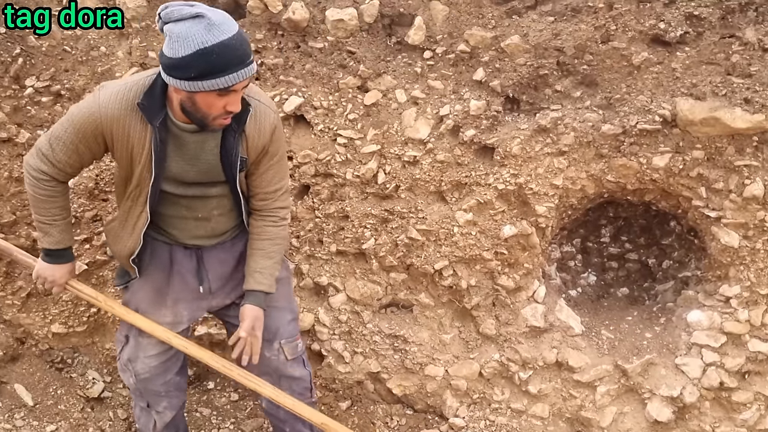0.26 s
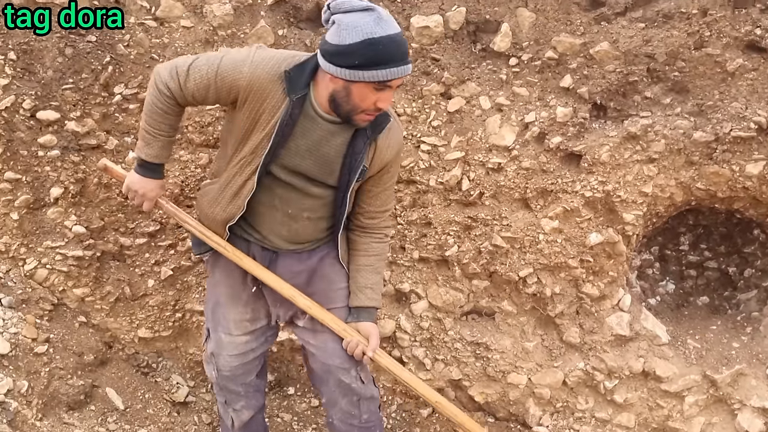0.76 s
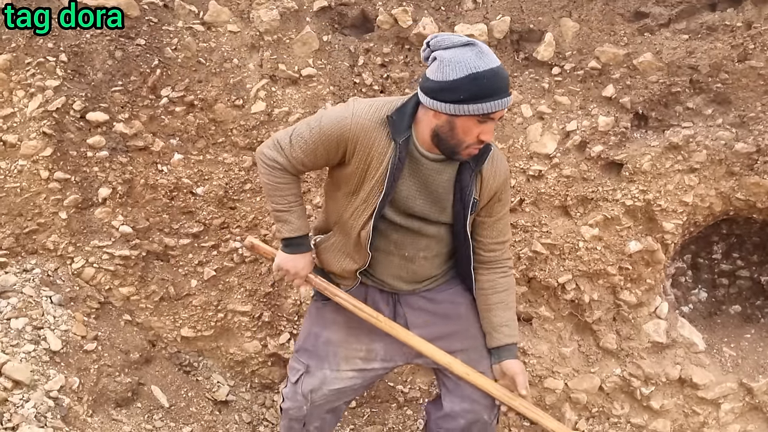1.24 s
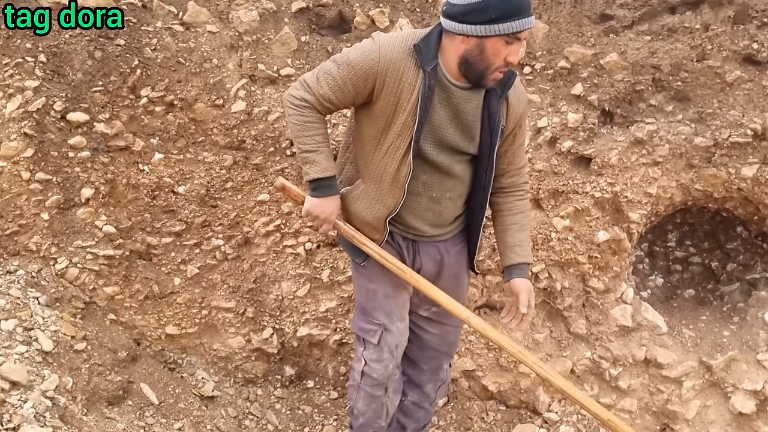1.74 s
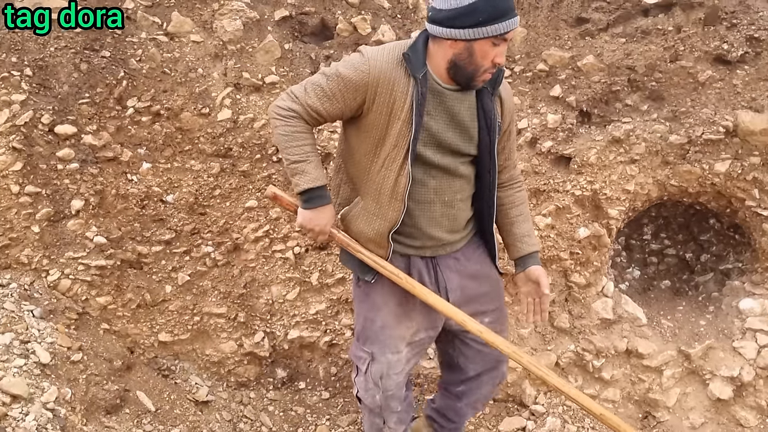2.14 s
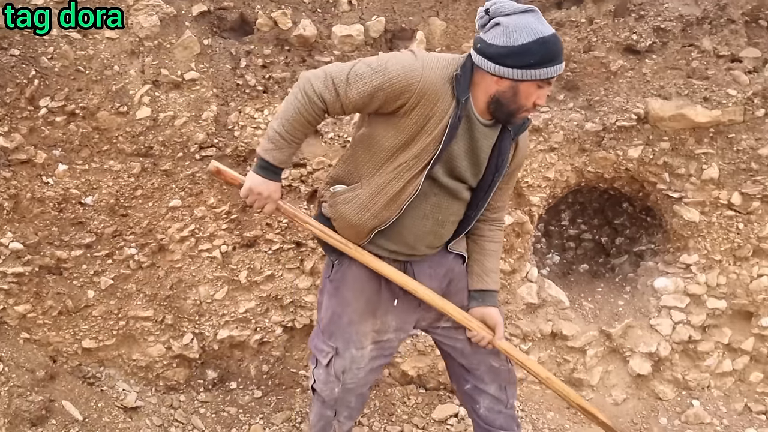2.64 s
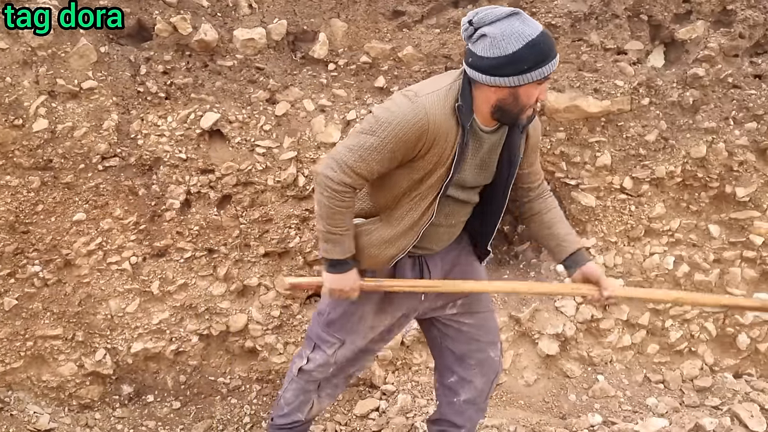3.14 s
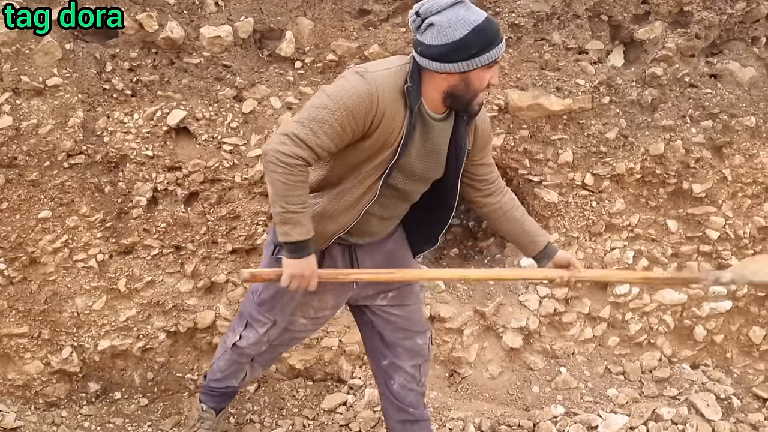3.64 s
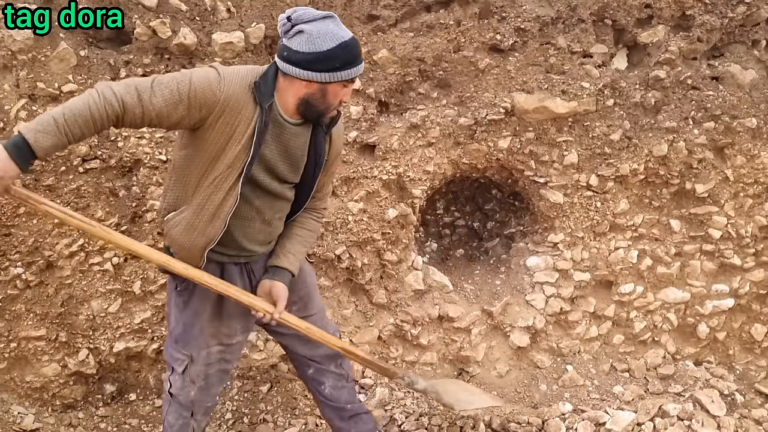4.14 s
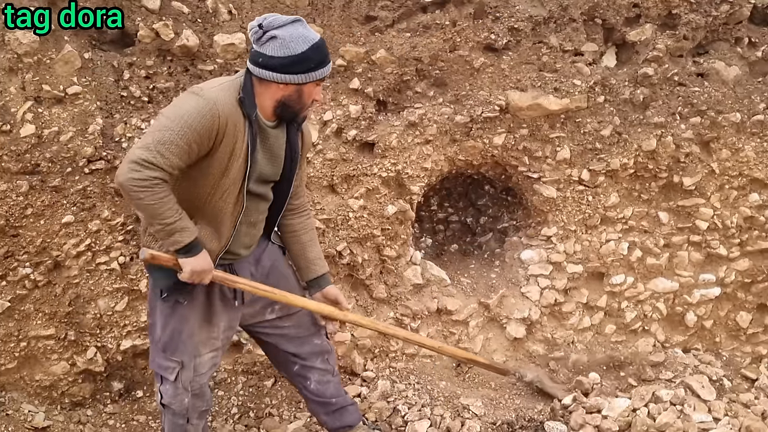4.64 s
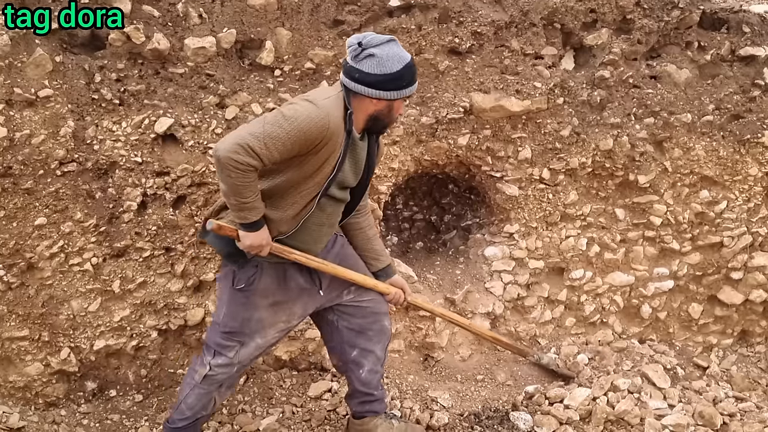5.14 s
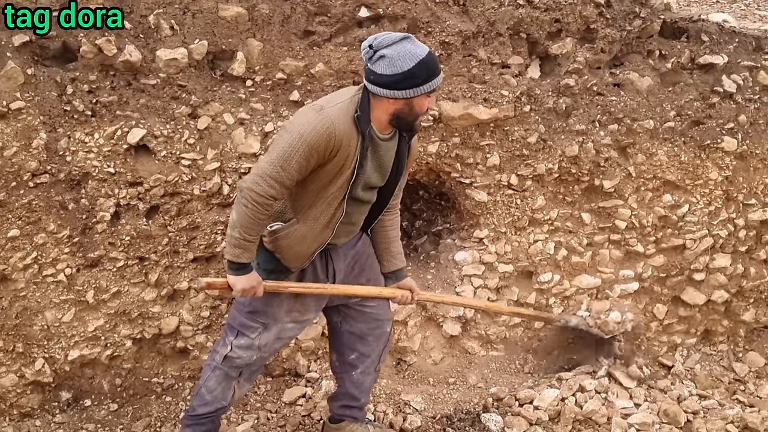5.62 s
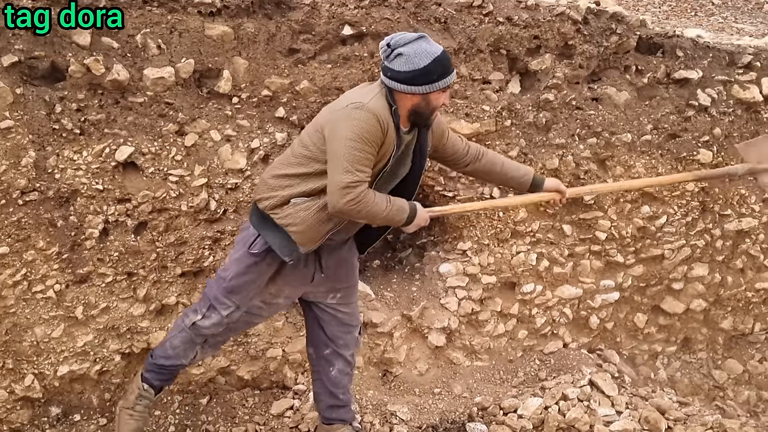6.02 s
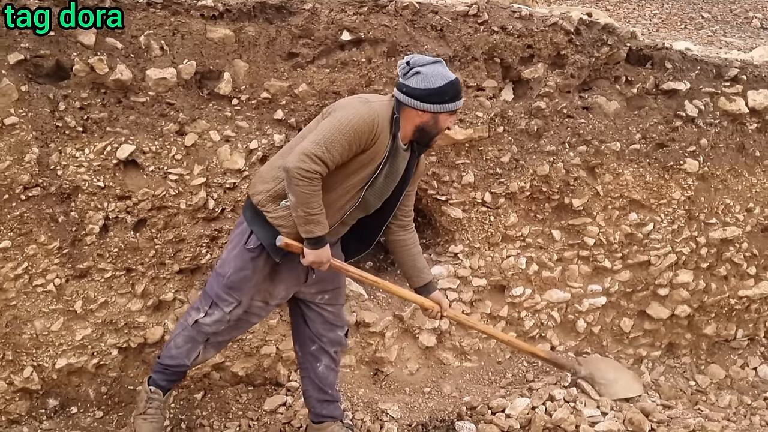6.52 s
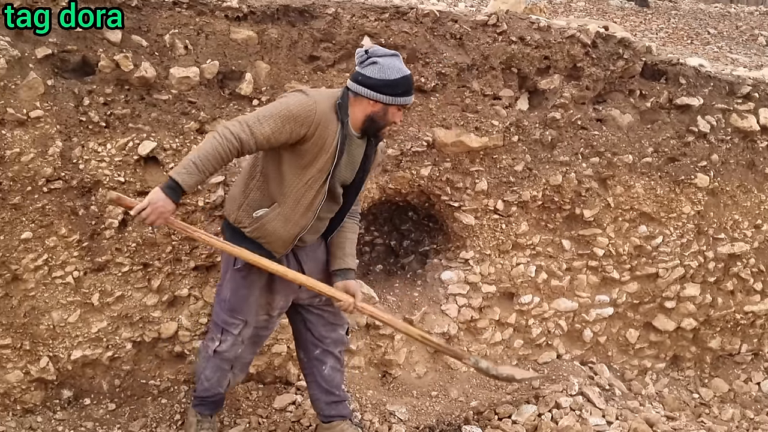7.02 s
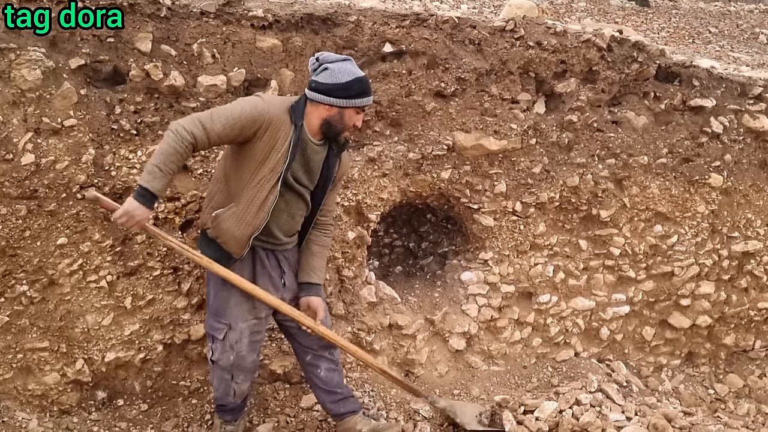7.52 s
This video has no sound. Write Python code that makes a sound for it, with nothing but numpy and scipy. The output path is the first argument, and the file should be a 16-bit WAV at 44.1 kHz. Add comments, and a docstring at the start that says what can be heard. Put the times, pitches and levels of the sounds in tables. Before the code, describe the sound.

A steel shovel crunches and scrapes through stony earth outdoors, stones knocking on the blade, then one loud ringing clink on rock.

```python
"""Shovelling stony earth

A long-handled steel shovel works at the foot of a bank, a few metres from a phone with two microphone ports.
Clods, gravel and grit are grainy filtered noise, coloured by the soil-damped blade; knocking stones are short
bursts with a ring. The empty blade rings on rock as decaying sines, once loudly; dull thumps accompany the work.
Gusts of low noise buffet the microphone over a quiet outdoor hiss, and the bank returns a short echo."""
import sys
import numpy as np
from scipy import signal
from scipy.fft import rfft, irfft
from scipy.io import wavfile
from scipy.ndimage import uniform_filter1d

SR = 44100
rng = np.random.default_rng(int(sys.argv[2]) if len(sys.argv) > 2 else 0)


def wav_record(signal):
    """Record a signal, one row per channel, as 16-bit PCM in the file named by sys.argv[1]."""
    frames = np.transpose(np.atleast_2d(signal))
    bounded = np.clip(frames, -1, 1)
    # unit amplitude maps onto the largest positive 16-bit level
    quanta = np.round(bounded * 32767).astype(np.int16)
    wavfile.write(sys.argv[1], SR, quanta)


N = 342657
TIME = np.arange(N) / SR
FREQS = np.maximum(np.arange(2049) * SR / 4096, 1)  # filter grid in Hz, kept above 0 for logarithms


def undb(db):
    """Decibels to gain."""
    return 10 ** (np.asarray(db) / 20)


def unit(x):
    """Scale to rms 1."""
    return x / np.sqrt(np.mean(x ** 2))


def spectrum(points):
    """Gain over frequency from (Hz, dB) points, joined on a logarithmic frequency axis."""
    hz, db = np.transpose(points)
    return undb(np.interp(np.log(FREQS), np.log(hz), db))


def resonances(modes):
    """Gain over frequency of broad (Hz, width Hz, dB) humps."""
    return undb(sum(db / (1 + (2 * (FREQS - hz) / width) ** 2) for hz, width, db in modes))


def colour(x, gain):
    """Causal minimum-phase filter with the given gain, built from its cepstrum."""
    cepstrum = irfft(np.log(gain))
    half = len(cepstrum) // 2
    cepstrum[1:half] *= 2
    cepstrum[half + 1:] = 0
    impulse = irfft(np.exp(rfft(cepstrum)))[None, :half]
    return signal.oaconvolve(x, impulse, axes=1)[:, :x.shape[1]]


def two_ports(x, apart_hz=1500, side_db=-17):
    """Two unrelated signals become left and right: alike in the bass, unrelated in the treble."""
    hz = np.arange(x.shape[1] // 2 + 1) * SR / x.shape[1]
    side_gain = np.minimum(np.hypot(undb(side_db), (hz / apart_hz) ** 2), 1)
    mid, side = rfft(x[0]), side_gain * rfft(x[1])
    return irfft(np.array([mid + side, mid - side]) / np.hypot(1, side_gain), x.shape[1])


def noise(size):
    """White noise as the two ports hear it."""
    return two_ports(rng.standard_normal((2, size)))


def ringing(t, hz, phase, skew):
    """A sine at both ports, phase in radians over 2 pi cycles; short waves reach them out of step."""
    port_phase = np.array([[1], [-1]]) * skew * min((hz / 1900) ** 2, 1)
    return np.sin(2 * np.pi * (hz * t + phase) + port_phase)


def add(out, s, x):
    """Mix x into out from time s."""
    i = max(int(s * SR), 0)
    out[:, i:i + x.shape[1]] += x[:, :N - i]


def swell_and_fade(s, rise_s, fall_s):
    """A gain that grows exponentially to 1 at time s and dies away again."""
    before = (s - TIME) / max(rise_s, .002)
    after = (TIME - s) / max(fall_s, .002)
    return np.exp(-np.minimum(np.maximum(before, after), 30))


# spectral shape of the hiss over the open hillside: pitch_hz, level_db
AIR = [(30, -12.5), (100, -2.5), (250, 0), (550, -10), (1100, -12), (2200, -45), (8100, -28), (9000, -31.5),
       (10500, -33.5), (13000, -16), (16000, -30)]


def air(level_db=-63):
    """Faint steady hiss of the open hillside: noise with a fixed colour."""
    return undb(level_db) * unit(colour(noise(N), spectrum(AIR)))


# the breeze between gusts: time_s, level_db
BREEZE = [(0, -58.5), (0.6, -53), (1.4, -58.5), (2.9, -51), (5.3, -59), (5.48, -73), (5.85, -62),
          (6.8, -62), (7.77, -62.5)]
BREEZE_WANDER_DB, BREEZE_WANDER_PER_S = 3, 11  # spread of the random wander, and its new values per second
# gusts at the microphone: peak_s, level_db, span_s (to swell, and again to fade)
GUSTS = [(0.46, -51, .04), (0.7, -44.5, 0.038), (1.1, -49, 0.063), (2.369, -45, 0.042), (2.68, -31, 0.036),
         (2.768, -26.5, 0.064), (2.95, -34, 0.043), (3.212, -26, 0.045), (3.44, -40, 0.16),
         (3.901, -36.5, 0.028), (4.12, -40.5, 0.042), (4.5, -45, 0.11), (4.87, -46.5, 0.06),
         (5.03, -40, 0.033), (5.33, -52, 0.044), (6.55, -47.5, 0.068), (7.0, -44.5, 0.071),
         (7.25, -39, 0.042), (7.35, -41, 0.068), (7.729, -28.5, 0.074)]


def wind_level():
    """Level of the wind in dB: gusts swell and fade over a wandering breeze, their powers adding."""
    wander = np.interp(TIME * BREEZE_WANDER_PER_S, np.arange(256), rng.standard_normal(256))
    breeze = undb(np.interp(TIME, *np.transpose(BREEZE)) + BREEZE_WANDER_DB * wander)
    gusts = sum((undb(db) * swell_and_fade(s, span_s, span_s)) ** 2 for s, db, span_s in GUSTS)
    return 10 * np.log10(breeze ** 2 + gusts)


# spectral shape of wind rumble at the microphone: pitch_hz, level_db
GUST = [(12, -23), (30, -7), (65, 1.5), (100, -3), (160, -11.5), (300, -21), (700, -41), (2000, -77)]


def wind(lean_db=3):
    """Eddies buffet each port largely on its own, the right one more: low noise that follows the wind level."""
    gust_db = wind_level()
    own, shared = rng.standard_normal((2, N)), rng.standard_normal(N)
    rumble = unit(colour(own + 0.33 * shared, spectrum(GUST)))
    # even out the rumble's own swells so that the wind level sets them
    swell = np.sqrt(uniform_filter1d(np.mean(rumble ** 2, axis=0), size=2500))
    return rumble / swell * undb(gust_db + np.array([[-lean_db], [lean_db]]) - 0.5)


def bank(x, echo_db=-17, t60=0.11, size=18000):
    """The rough earth wall and the ground scatter a short echo, thin in the bass and strongest near 5 kHz:
    convolution with decaying noise."""
    t = TIME[:size]
    tail = noise(size) * undb(-60 * t / t60) * (1 - np.exp(-t / 0.0014))
    tail = colour(tail, spectrum([(100, -16.5), (500, -18), (1500, -2.5), (5000, 1.0), (15000, -18.5)]))
    return undb(echo_db) * signal.oaconvolve(x, unit(tail) / np.sqrt(size), axes=1)[:, :N]


# dull thumps of boots and handle: start_s, peak_db, pitch_hz, decay_s
THUMPS = [(0.302, -38, 276, 0.013), (2.674, -26, 129, 0.008), (2.753, -30.5, 205, 0.0049),
          (3.662, -31, 161, 0.0053), (3.764, -36, 238, 0.007), (4.865, -33, 63, 0.021),
          (7.256, -28.5, 79, 0.011)]


def thumps(size=6000):
    """Soft blows: low sines that swell and die within a few cycles."""
    out, t = np.zeros((2, N)), TIME[:size]
    for s, db, hz, decay_s in THUMPS:
        age = 2 * t / decay_s
        add(out, s, undb(db) * ringing(t, hz, 0, 0) * age * np.exp(1 - age))
    return out


def pebbles(gravel_db, fine_db, level_db=-2, scatter_db=3, count=800, size=2600):
    """Small stones tick against each other as strongly as earth moves, each a decaying sine at its own pitch."""
    out, t = np.zeros((2, N)), TIME[:size]
    for when, pitch, weight, skew in rng.random((count, 4)):
        i = int(when * N)
        hz, cycles = 800 * 9 ** pitch, 7 + 12 * pitch
        # many weak ticks, few strong ones
        db = level_db + gravel_db[i] + pitch * fine_db[i] - scatter_db * np.log(weight + 0.017)
        tick = ringing(t, hz, 0, np.pi * (skew - .5)) * np.exp(-t * hz / cycles)
        add(out, when * N / SR, undb(db) * tick)
    return out


def small_knocks(gravel_db, level_db=-1, scatter_db=3, low_hz=600, high_hz=4500,
                 ring_db=-4, contact_s=0.0055, count=150):
    """Lesser stones knock at random, as strongly as the gravel is moving; rows like those of KNOCKS."""
    rows = []
    for when, weight, pitch in rng.random((count, 3)):
        db = gravel_db[int(when * N)] + level_db + scatter_db * (2 * weight - 1)
        hz = low_hz * (high_hz / low_hz) ** pitch
        rows.append((when * N / SR, db, hz, 0, ring_db, contact_s))
    return rows


# stones that knock on the blade or land: start_s, level_db (energy taken over 10 ms), pitch_hz,
# bright_db (per octave), ring_db (relative to the noisy knock), contact_s
KNOCKS = [(0.075, -27.5, 800, 2, -8, 0.0083), (0.257, -38, 361, 7, -0.5, 0.013),
          (0.303, -35, 413, 6, 6, 0.0043), (0.789, -35, 465, 8, 1, 0.0039),
          (0.815, -30.5, 1550, 5, 1, .007), (0.947, -27, 466, 8, 1, 0.011),
          (0.992, -24, 495, -2, -2.5, 0.0092), (1.015, -20.5, 790, 2, -7.5, 0.014),
          (1.061, -22, 1200, -4.5, 4, 0.0096), (1.079, -17.5, 2230, -3, -2.5, 0.0039),
          (1.083, -16.5, 1750, -3, -4.5, 0.0029), (1.111, -21, 2130, -5, -4, 0.0099),
          (1.132, -28, 1123, -5, -6, 0.014), (1.601, -50.5, 1100, -4, 5, 0.0012),
          (2.636, -45, 600, 5.5, -1, .006), (2.675, -36.5, 817, 0, -3.5, 0.0051),
          (2.753, -31.5, 322, 4.5, 6, 0.003), (2.821, -30, 1240, 2.5, -16, .01),
          (2.85, -32, 1400, -5, -6, 0.03), (2.919, -45, 830, -1, -2, .006),
          (2.937, -27, 1460, -3.5, -6, 0.01), (2.954, -31.5, 2750, 5.5, -5, 0.0087),
          (2.975, -29.5, 1254, 2.5, -2, 0.0072), (3.011, -31.5, 1320, 1.5, -6, 0.0076),
          (3.039, -40, 2800, -3, -2, .0044), (3.056, -37, 690, 2, 0, 0.0037),
          (3.084, -33, 2780, -4, -10, .0056), (3.127, -22, 917, -1, 6.5, 0.0078),
          (3.157, -35, 8500, -4, -20, 0.0093), (3.189, -32.5, 2340, -2.5, -2, 0.0028),
          (3.225, -31.5, 3210, -5, -4, .003), (3.264, -28, 7470, 3, -12, 0.0065),
          (3.287, -28, 2410, -1.5, -2, 0.0063), (3.342, -35, 2820, 11, -7, .003),
          (3.407, -28, 2715, 0, -1, .004), (3.416, -34.5, 2670, 2, 2, 0.0042),
          (3.572, -49, 1695, -5.5, -2, 0.0073), (3.759, -31, 1100, 5, -2, 0.00058),
          (3.762, -25.5, 1990, 2, -10, 0.0063), (3.822, -35.5, 5400, -4.5, -23, 0.0068),
          (3.855, -38, 7160, -4, -12, 0.0046), (3.882, -32, 5400, 1, -15, 0.0018),
          (3.917, -27, 6820, -3, -8, 0.0029), (3.933, -31.5, 6830, -3, -1, .0009),
          (3.973, -27, 2060, -2, -3, 0.0022), (4.014, -35, 1160, 3, -2, .0016),
          (4.077, -34, 6550, 10, -11, 0.0051), (4.139, -39.5, 7800, 3, -3, .002),
          (4.164, -36, 3450, -10, -9, 0.0043), (4.241, -38.5, 4830, 11.5, -6, 0.0018),
          (4.299, -33, 1520, -5.5, -21, 0.014), (4.312, -30, 895, 1.5, -7, .012),
          (4.381, -25.5, 1213, 8, -8, 0.023), (4.489, -15.5, 1540, 6.5, -12, 0.0095),
          (4.502, -16, 1197, -1, -8, 0.01), (4.556, -28, 2170, 5, -1, .0046),
          (4.595, -27.5, 1280, -0.5, -30, 0.0073), (4.615, -32, 944, 0.5, -7, 0.014),
          (4.635, -36.5, 5500, -2, -18, 0.0087), (4.824, -53, 1250, 3, -20, .0024),
          (5.09, -35.5, 1580, -5.5, -1, 0.0022), (5.279, -47, 5400, 10, -18, 0.005),
          (5.355, -43.5, 4780, 0.5, -7, 0.012), (5.549, -57.5, 1300, -6, -8, 0.0024),
          (5.69, -48.5, 520, 1, -8, .006), (5.761, -39, 1530, -10, -5, 0.0059),
          (5.845, -40, 2200, 1.5, -4, .004), (5.887, -38.5, 875, 1.5, -34, 0.0086),
          (5.924, -33, 5060, -4, -4, 0.0077), (5.929, -27, 3230, 3, -13, 0.0033),
          (6.025, -30, 2820, -2.5, -1, 0.0024), (6.044, -34.5, 1620, -0.5, 0, .0016),
          (6.572, -38, 3620, -3, -21, .0045), (6.957, -49, 1450, 5, -13, 0.014),
          (7.252, -38.5, 7300, 6, -22, 0.0061), (7.381, -41, 1385, -3, -2, 0.014),
          (7.454, -41.5, 7900, 3, -14, 0.0044), (7.476, -38, 1200, 11, -29, 0.015),
          (7.5, -31, 2210, -2, -6, 0.011), (7.529, -24.5, 576, 6, 3.5, .015),
          (7.6, -28, 1520, -0.5, -24, 0.012), (7.638, -30.5, 3940, -6, -21, .012),
          (7.742, -32.5, 506, 4.5, -4, 0.0063)]
# spectral shapes of stone chips and of dust: pitch_hz, level_db
CHIPS = [(1500, -34), (2500, -0.5), (3000, -2), (4500, -2.5), (5800, -6), (7000, -29), (10000, -41)]
DUST = [(3500, -49), (5300, -2), (6200, -0.5), (8100, 0), (9000, -9.5), (10500, -9.5), (13000, -9),
        (16000, -18)]
# centres of clods, gravel, chips and dust: pitch_hz
BAND_HZ = (500, 1400, 3600, 7800)
KNOCK_FALL_DB = 7.5  # a knock weakens by this per octave away from the stone's pitch


def knocks(stones, size=6000, rise_s=0.00044, tail_db=-21, tail_s=0.039):
    """A stone ticks, grinds for a moment and lets go, ringing at its own pitch; crumbs trail after it."""
    out, t = np.zeros((2, N)), TIME[:size]
    blade = resonances(LOADED_BLADE) ** 0.57  # the blade colours knocks less than pressed earth
    bands = np.array([unit(spectrum(points) * blade) for points in (CLODS, GRAVEL, CHIPS, DUST)])
    crumbs = undb(tail_db) * np.exp(-t / tail_s)
    rise = 1 - np.exp(-t / rise_s)
    ten_ms = SR / 100
    for s, db, hz, bright_db, ring_db, contact_s in stones:
        age = t / max(contact_s, .0005)
        burst = noise(size) * rise * (np.exp(-age ** 1.5) + crumbs)
        # first touch: one hard tick, reaching each port at its own moment
        burst[[0, 1], rng.integers(0, 8, 2)] += 6.5
        octaves = np.log2(np.array(BAND_HZ) / hz)
        shares = undb(bright_db * octaves - KNOCK_FALL_DB * np.abs(octaves))
        knock = unit(colour(burst, np.sqrt(shares ** 2 @ bands ** 2)))
        ring = ringing(t, hz, 0, rng.uniform(-1.34, 1)) * rise * np.exp(-age)
        stone = unit(knock + undb(ring_db) * unit(ring))
        add(out, s, undb(db) * stone * np.sqrt(ten_ms / size))
    return out


# the empty blade meets a rock: start_s, level_db (relative), spot_hz (pitch favoured by the struck spot),
# spot_db (by how much)
CLINKS = [(6.4132, 3.5, 870, 0), (7.252, -29, 1050, 18), (7.38, -30.5, 1380, 16)]
# modes of the free blade: pitch_hz, level_db (relative), t60_s (before soil chokes it)
FREE_BLADE = [(168.7, -21, 0.12), (223, -19, 0.22), (498, -7.5, 0.1), (587, -2, 0.054), (869, -4.5, 0.59),
              (1000, -13.5, 0.37), (1190, -13, 0.08), (1251, -3, 0.37), (1355, -6, 0.18), (1450, -11, 0.12),
              (2180, -16, 0.22), (2080, -10.5, 0.24), (2300, -20.5, 0.1), (2440, -6, 0.12),
              (2770, -26, .14), (2930, -8, 0.1), (3110, -24, 0.073), (3500, -27, 0.12), (3980, -8.5, 0.09),
              (3910, -7, .12), (4610, -14, 0.11), (6492, -8, 0.091), (7740, -20, .18)]
# spectral shape of the noise of steel on rock: pitch_hz, level_db
CLINK_SPRAY = [(100, -15.5), (200, -10), (380, -14.5), (520, -7), (1300, -9), (1900, -3.5), (2900, -5.5),
               (5000, -8.5), (8100, -8), (9200, -18), (16000, -23.5)]


def clinks(ring_db=-16, crack_db=-13, spray_db=-21, thud_db=-18, choke_s=0.099, bite_s=0.014, size=22000):
    """The steel edge cracks on a rock, bites again an instant later, and the free blade rings out in its modes."""
    out, t = np.zeros((2, N)), TIME[:size]
    steel = spectrum(CLINK_SPRAY) * resonances([(hz, 70, 5) for hz, _, _ in FREE_BLADE])
    crack_gain = steel * spectrum([(500, 3.0), (2000, 0), (4000, 6.5), (15000, -3.0)])
    thud_gain = steel * spectrum([(200, 0.5), (900, 4), (2500, -3), (15000, -19.5)])
    # the ring builds until the second bite
    drive = (1 - 0.35 * np.clip(1 - t / bite_s, 0, 1)) * (1 - np.exp(-t / 0.00082))
    drive = drive * np.exp(-(t / choke_s) ** 2)  # soil closes on the blade and chokes it
    crack_shape = (1 - np.exp(-t / 0.0019)) * np.exp(-(t / 0.0085) ** 2)
    spray_shape = np.exp(-t / 0.027) + undb(-21.5) * np.exp(-t / 0.085)
    for s, level_db, spot_hz, spot_db in CLINKS:
        ring = 0
        for (hz, db, t60), (phase, skew) in zip(FREE_BLADE, rng.standard_normal((len(FREE_BLADE), 2))):
            favour_db = spot_db / (1 + ((hz - spot_hz) / 60) ** 2)
            ring = ring + undb(db + favour_db - 60 * t / t60) * ringing(t, hz, phase, skew)
        add(out, s, undb(level_db + ring_db) * ring * drive)
        crack = unit(colour(noise(size), crack_gain))
        add(out, s + 0.000935, undb(level_db + crack_db) * crack * crack_shape)
        spray = unit(colour(noise(size), steel))
        add(out, s + .002, undb(level_db + spray_db) * spray * spray_shape)
        thud = unit(colour(noise(size), thud_gain))
        add(out, s + bite_s, undb(level_db + thud_db) * thud * np.exp(-t / 0.014))
    return out


# the blade goes through earth: bite_s, hardest_s, stop_s, gravel_db, ease_db (drop towards both ends),
# clod_db and grit_db (relative to gravel)
STROKES = [(-0.04, -0.015, 0.076, -38.5, 5, 1.5, -2), (0.79, 0.874, 1.138, -27, 10, -1.5, -3.5),
           (2.782, 2.868, 2.92, -36.5, 7.5, -3.5, -7.5), (3.034, 3.234, 3.35, -42.5, 4, -8, -1.5),
           (3.879, 3.932, 4.2, -45, 3.5, -3.5, 8), (4.301, 4.496, 4.58, -27, 9, -12, -2.5),
           (4.912, 4.982, 5.162, -38.5, 13.5, -8.5, -4.5), (7.475, 7.623, 7.65, -36, 10.5, -2.5, 3.5)]
BITE_DB_PER_S, RELEASE_DB_PER_S = 900, 259  # how fast a stroke sets in and dies away
GRIT_EASE_DB = 4.5  # towards the ends of a stroke the grit drops this much more than the gravel
# loose earth slides and settles: peak_s, settle_s, gravel_db, clod_db and grit_db (relative to gravel)
SPILLS = [(0.27, 0.094, -54.5, 6, -2.5), (0.56, 0.22, -54.5, -1.5, -3.5), (1.23, 0.063, -44.5, -2.5, -6),
          (1.52, 0.33, -58.5, -1, -7), (2.059, 0.064, -60.5, 4.5, 4.5), (2.57, 0.19, -55.5, -3.5, 0.5),
          (3.43, .08, -55.5, -2, 4), (3.792, 0.026, -46.5, -12, 4), (4.76, 0.1, -58.5, -8, 0.5),
          (5.3, 0.069, -59.5, 4, 9.5), (5.712, 0.024, -54.5, 0, 4.5), (5.9, 0.11, -56.5, -4, 1.5),
          (6.04, 0.15, -52.5, -7, 0.5), (6.28, 0.27, -63.5, -3, 6), (6.6, 0.074, -61, -18, 14),
          (7.038, 0.047, -58, -5, -0.5), (7.28, 0.03, -51, -8, -15), (7.43, 0.057, -56.5, -4, 1)]
SPILL_RISE = 0.73  # a spill builds in this share of its settling time
# earth that never quite comes to rest: level_db of gravel, clods and grit
TRICKLE_DB = (-68.5, -68, -64)


def earth():
    """Levels in dB of moving gravel, clods and grit: strokes bite, peak and ease off; spills slide and settle."""
    power = np.outer(undb(TRICKLE_DB) ** 2, np.ones(N))
    for bite, hardest, stop, db, ease_db, clod_db, grit_db in STROKES:
        ease = np.interp(TIME, [bite, hardest, stop], [1, 0, 1])
        outside_db = BITE_DB_PER_S * np.maximum(bite - TIME, 0) + RELEASE_DB_PER_S * np.maximum(TIME - stop, 0)
        gravel = undb(db - ease_db * ease - np.minimum(outside_db, 100))
        clods = gravel * undb(clod_db)
        grit = gravel * undb(grit_db - GRIT_EASE_DB * ease)
        power += np.array([gravel, clods, grit]) ** 2
    for s, settle_s, db, clod_db, grit_db in SPILLS:
        peaks = undb(db + np.array([0, clod_db, grit_db]))
        power += np.outer(peaks, swell_and_fade(s, SPILL_RISE * settle_s, settle_s)) ** 2
    return 10 * np.log10(power)


def crunch(rate, spread_db, grain_s, bed_db):
    """Countless tiny fractures (rate per second) of unequal size, each dying at once, over a smooth rub."""
    sizes = undb(spread_db * np.minimum(rng.exponential(size=N), 3.5))
    hits = (rng.random(N) < rate / SR) * sizes
    power = signal.lfilter([1], [1, -np.exp(-2 / (grain_s * SR))], hits ** 2)
    power /= uniform_filter1d(power, size=1100) + 1e-9  # the push on the shovel sets the mean
    return noise(N) * np.sqrt(np.abs(power) + undb(2 * bed_db))


# resonances of the blade while soil damps it: pitch_hz, width_hz, level_db
LOADED_BLADE = [(532, 135, 12.5), (788, 45, 8), (922, 87, 8.5), (1207, 290, 9.5), (1492, 85, 7),
                (1673, 116, 10), (2227, 270, 11.5), (2900, 73, 1.5), (3670, 170, 9.5), (4080, 110, 12.5),
                (5850, 68, 1.5), (6640, 100, 2), (7500, 160, 10)]
# spectral shapes of the earth's coarse, middle and fine parts: pitch_hz, level_db
CLODS = [(120, -23), (250, -7), (380, -4.5), (500, 1.5), (760, -2.5), (950, -8), (1600, -59.5)]
GRAVEL = [(400, -49), (660, -2.5), (830, -1.5), (1300, 1), (2000, -2), (2600, -3.5), (3300, -8),
          (6000, -70)]
GRIT = [(1400, -32), (2400, -8.5), (3000, -2), (5000, -2), (8100, -2), (9000, -9.5), (10500, -11),
        (13000, -8), (16000, -15)]


def digging(gravel_db, clod_db, grit_db):
    """Clods thud, gravel crunches and grit hisses; a harder push lets the blade colour them more."""
    push = np.clip((gravel_db + 44.5) / 18, 0, 1)
    blade = resonances(LOADED_BLADE)
    layers = [(crunch(rate=320, spread_db=0.0, grain_s=0.0028, bed_db=-21), CLODS, clod_db),
              (crunch(rate=580, spread_db=9.5, grain_s=0.0062, bed_db=-6), GRAVEL, gravel_db),
              (crunch(rate=1300, spread_db=4.5, grain_s=0.0036, bed_db=-4), GRIT, grit_db)]
    out = 0
    for grains, points, db in layers:
        loose = unit(colour(grains, spectrum(points)))
        pressed = unit(colour(grains, spectrum(points) * blade))
        out = out + undb(db) * ((1 - push) * loose + push * pressed)
    return out


def ground(x, gravel_db):
    """While earth moves strongly, a bounce off the slope follows about 3 ms behind; its delay sways slowly."""
    share = .45 * np.clip((gravel_db + 52) / 10, 0, 1)
    lag_s = .003 + .0005 * np.sin(2 * np.pi * .6 * TIME)
    bounce = np.array([np.interp(TIME - lag_s, TIME, port) for port in x])
    return (x + share * bounce) / np.hypot(1, share)


# change of the treble above SHEEN_HZ in the sounds of the work: time_s, level_db
SHEEN = [(0, -2.5), (1.0, -5), (2.5, -1), (3.2, -3), (4.5, -1), (5.6, 1), (6.4, 5.5), (7.77, -2.5)]
SHEEN_HZ = 9300


def sheen(x):
    """The highest treble of the work drifts: dullest near 1 s, brightest near 6.4 s."""
    top = signal.sosfiltfilt(signal.butter(2, SHEEN_HZ, "high", fs=SR, output="sos"), x)
    return x + (undb(np.interp(TIME, *np.transpose(SHEEN))) - 1) * top


def scene():
    """Shovel and stones before the bank, in light wind."""
    gravel_db, clod_db, grit_db = earth()
    work = ground(digging(gravel_db, clod_db, grit_db), gravel_db)
    work = work + pebbles(gravel_db, grit_db - gravel_db)
    work = work + knocks(KNOCKS + small_knocks(gravel_db)) + clinks() + thumps()
    work = sheen(work)
    return work + bank(work) + wind() + air()


TOP_HZ = 15900  # the phone passes nothing much above this


def record(dry):
    """The phone rounds the very loudest peaks and cuts the top of the treble."""
    rounded = dry / (1 + (dry / .88) ** 6) ** (1 / 6)
    return signal.sosfilt(signal.ellip(8, .2, 70, TOP_HZ, fs=SR, output="sos"), rounded)


dry = scene()
out = record(dry)
wav_record(out)
```